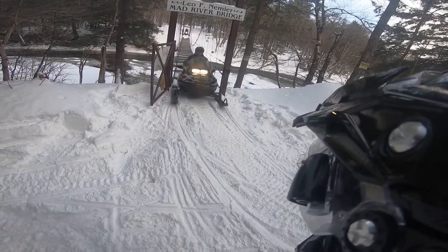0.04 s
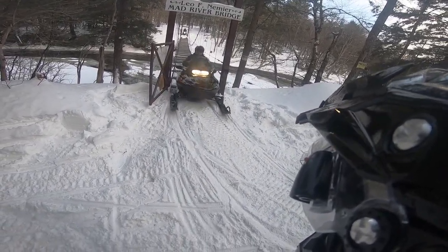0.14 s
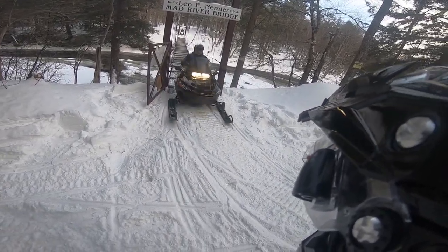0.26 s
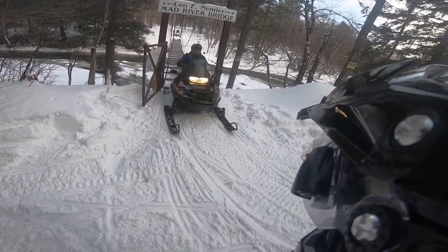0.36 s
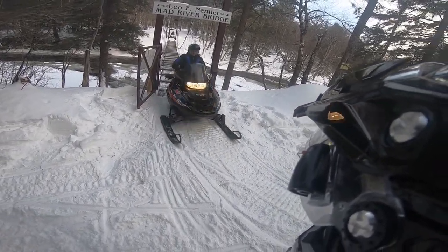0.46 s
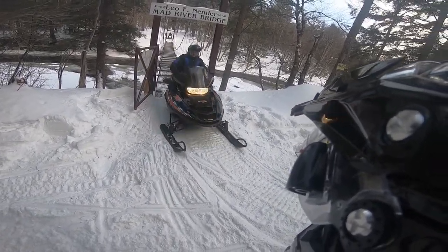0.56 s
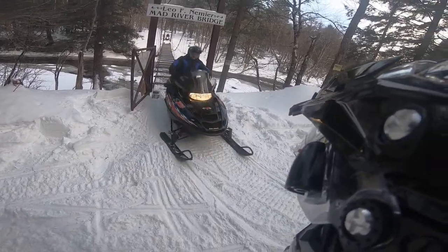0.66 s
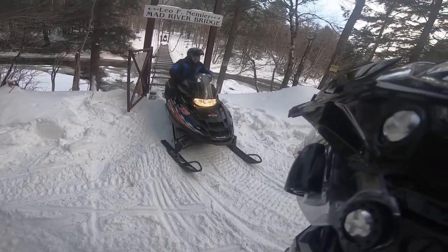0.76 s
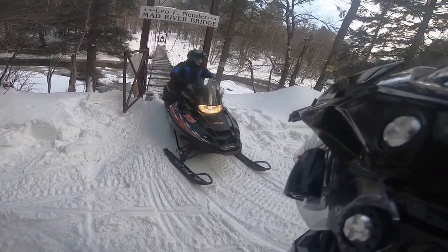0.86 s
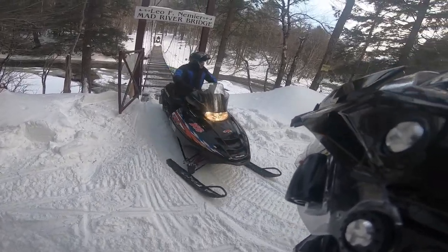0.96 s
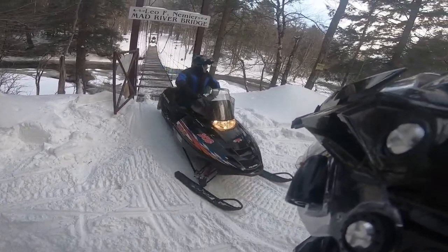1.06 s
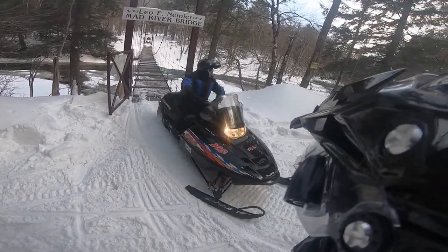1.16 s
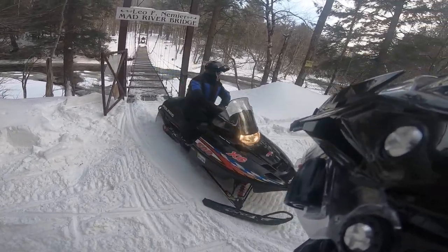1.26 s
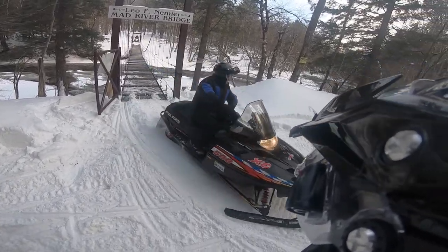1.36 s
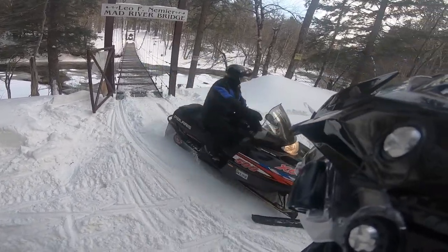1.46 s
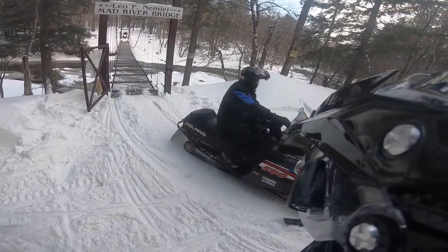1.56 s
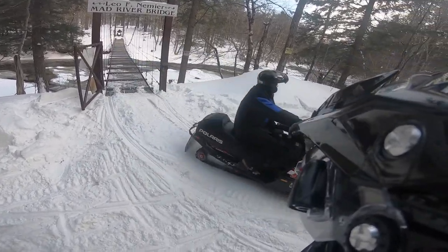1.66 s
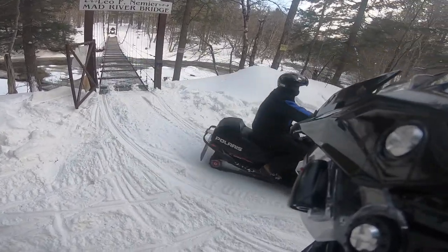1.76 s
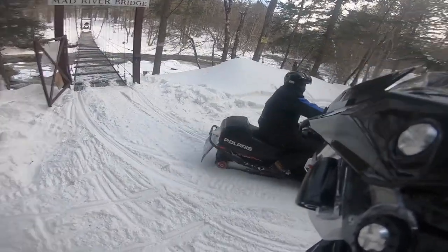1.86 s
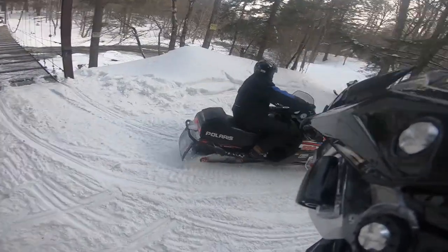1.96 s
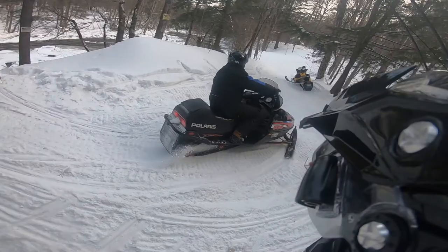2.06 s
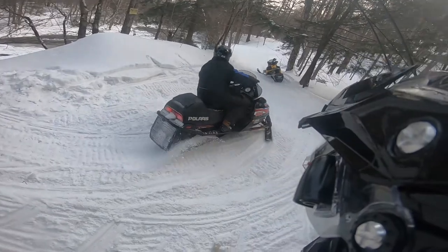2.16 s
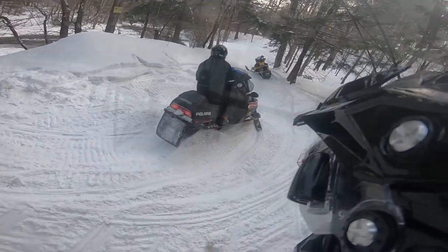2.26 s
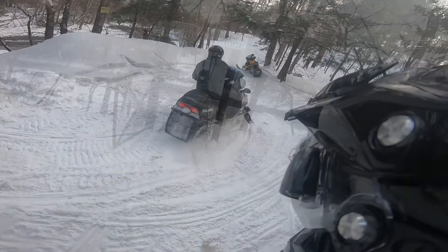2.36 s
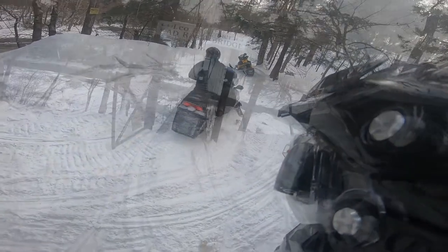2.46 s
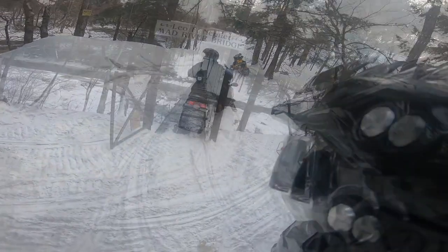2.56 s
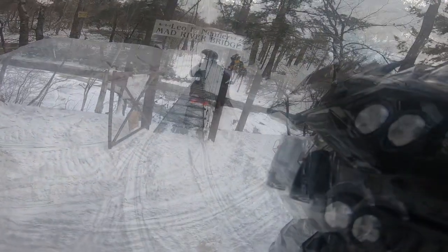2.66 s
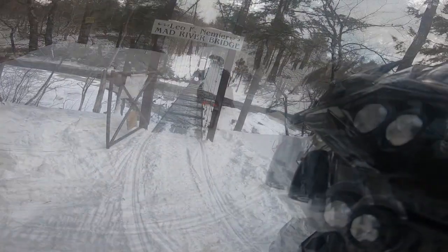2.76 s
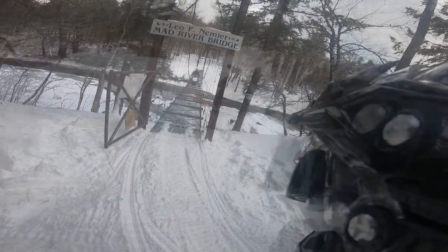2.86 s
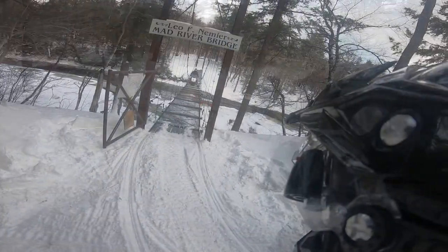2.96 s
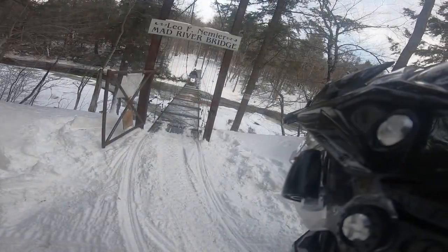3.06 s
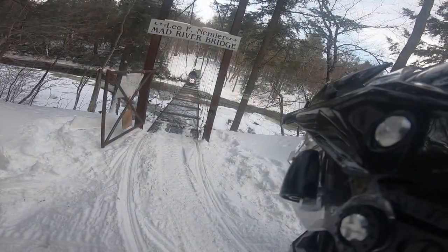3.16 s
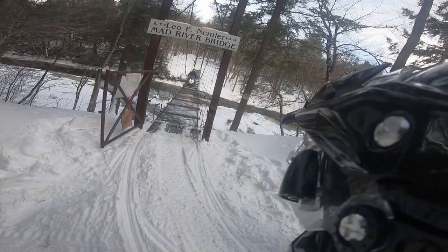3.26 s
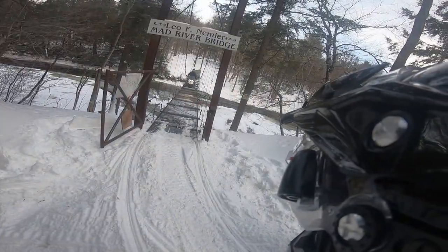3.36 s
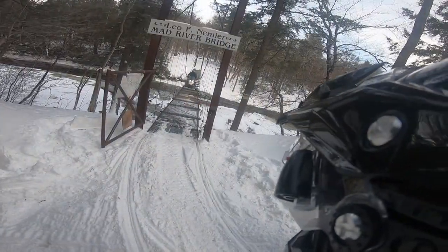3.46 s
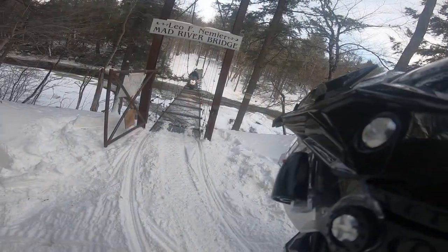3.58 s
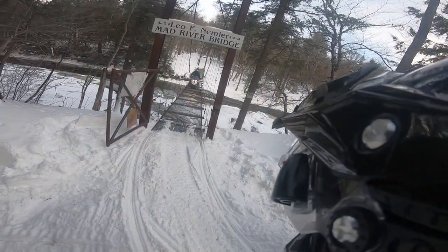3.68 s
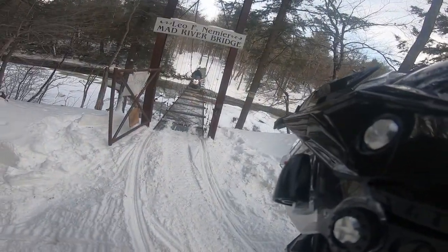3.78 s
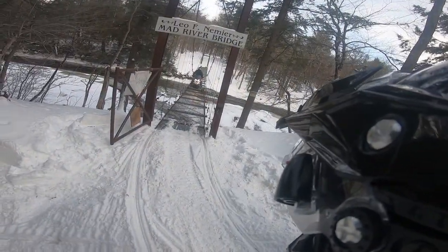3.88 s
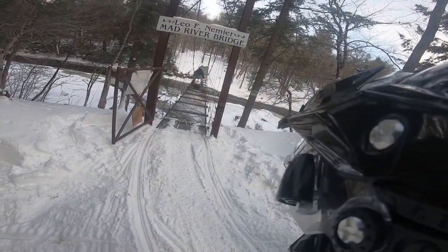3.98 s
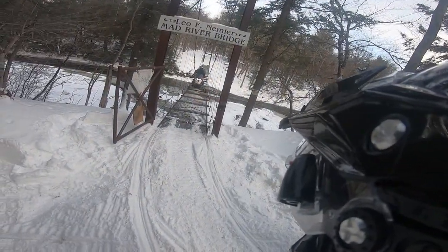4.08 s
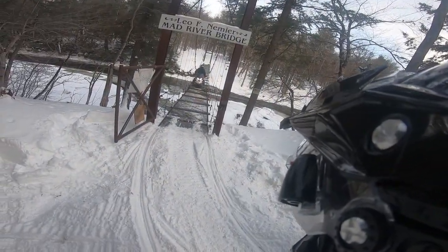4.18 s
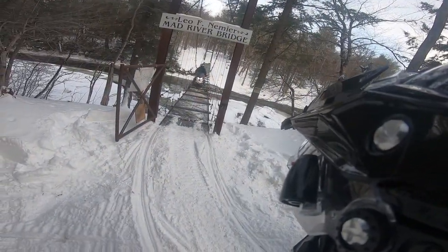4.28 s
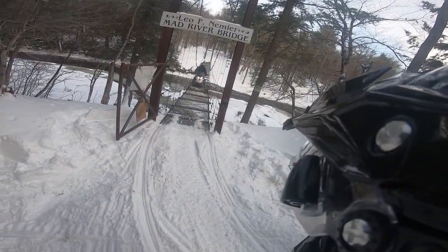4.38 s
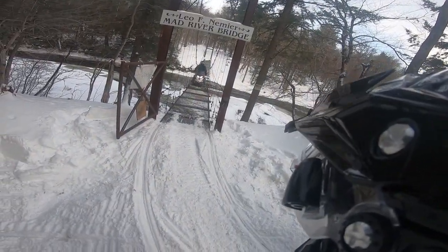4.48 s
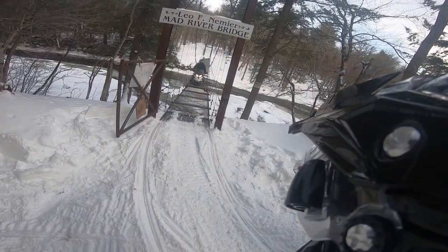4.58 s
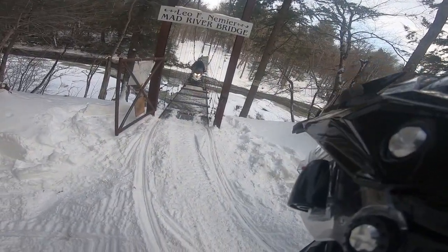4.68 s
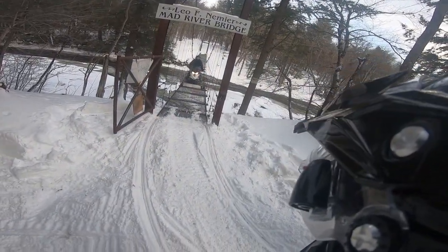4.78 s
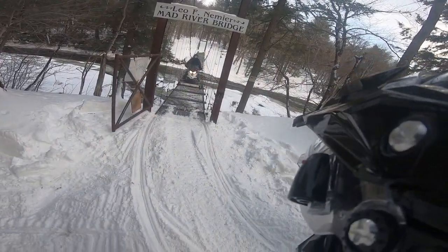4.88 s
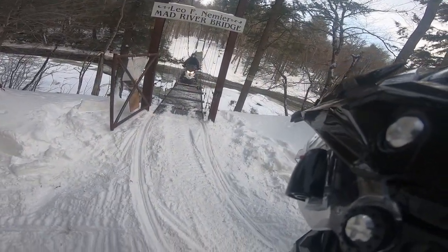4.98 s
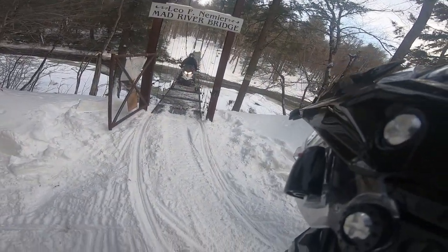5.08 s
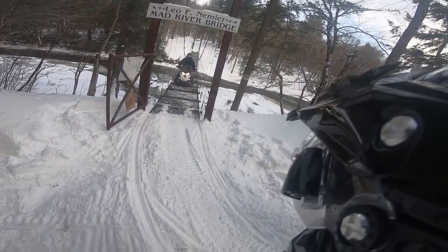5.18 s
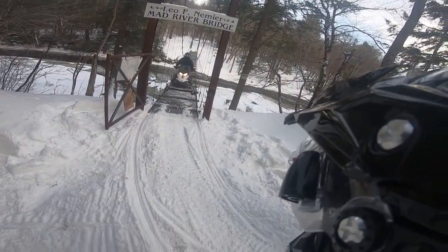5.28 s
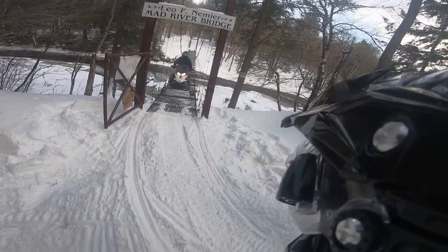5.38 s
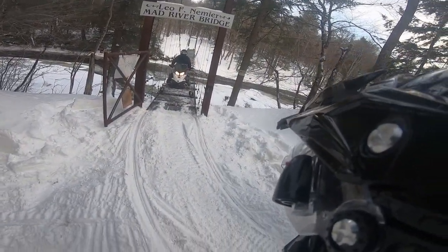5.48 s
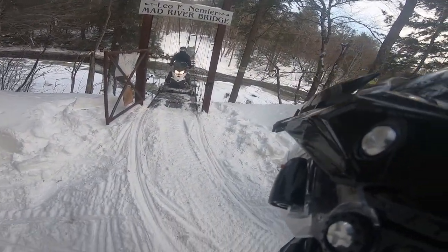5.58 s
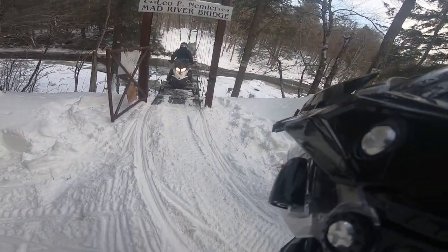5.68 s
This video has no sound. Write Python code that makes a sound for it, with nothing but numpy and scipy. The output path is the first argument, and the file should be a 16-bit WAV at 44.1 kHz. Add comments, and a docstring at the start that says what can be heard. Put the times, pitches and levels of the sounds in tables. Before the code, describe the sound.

A two-stroke snowmobile approaches, revs past close by on packed snow with a sharp knock, pulls away, then a parked sled idles and rattles.

```python
"""A two-stroke snowmobile nears, passes close on packed snow and pulls away: harmonics of its firing rate
give an exhaust note, a bark and a rasp, over the clatter of the track and the hiss of the skis.
Then a parked sled idles on beating tones and rattles its clutch, while an engine nears from far off.
Two microphone ports sit in a plastic case on a rider: its mount sways, rubs, takes bumps and once creaks.
The case rings, strongly near 1.2 and 1.7 kHz, and drives the ports partly against each other."""
import sys
import numpy as np
from scipy.fft import rfft, irfft, next_fast_len
from scipy.io import wavfile
from scipy.ndimage import map_coordinates

SR = 44100
rng = np.random.default_rng(int(sys.argv[2]) if len(sys.argv) > 2 else 0)


def output_pcm(signal):
    """Save a mono or channel-first signal as 16-bit PCM at the path in sys.argv[1].

    Samples are clipped to [-1, 1] before scaling.
    """
    pcm = np.clip(np.atleast_2d(signal).T, -1, 1) * 32767
    wavfile.write(sys.argv[1], SR, np.round(pcm).astype(np.int16))


N = 252869

# path of the moving engine: (time [s], distance [m], facing [dB], above 0 head-on and below 0 turned away)
SLED_PATH = [(0, 8.5, -8), (.55, 3.8, -13.5), (.85, 4.5, 2), (1.3, 3.2, -4.5), (1.72, 2.8, 0),
             (2.0, 3.05, -14), (2.36, 5, -15), (2.72, 19.5, -6.5), (3.0, 31, -1), (3.6, 18.6, 10),
             (5.73, 16, 0.5)]
# blows on the mount: (time [s], strength [dB], time constant of the ring's onset [s])
MOUNT_BLOWS = [(0.052, -25, 0.0026), (0.219, -36.5, 0.0024), (0.401, -38, 0.0045), (0.937, -34, 0.0021),
               (1.31, -36.5, 0.0033), (1.799, -14, 0.0023), (2.994, -38, 0.0035), (3.481, -31, 0.0036),
               (4.463, -34, 0.0012), (4.692, -33.5, 0.0025), (5.147, -37.5, 0.0056), (5.527, -43, 0.0049)]
NEAR_M = 3  # reference distance of the spreading law


def amp(db):
    """Level to amplitude: 20 dB is a factor of ten."""
    return 10 ** (np.asarray(db) / 20)


def lean(db):
    """Level balance: the left port gains db and the right loses it."""
    return amp([[db], [-db]])


def unit(x):
    """Normalization to rms 1; for a stereo pair, the rms of its centre."""
    centre = np.atleast_2d(x).mean(0)
    return x / np.sqrt(np.mean(centre ** 2) + 1e-20)


def along(points, hz, axis=1):
    """Spectral envelope: one column of a frequency table, read on a log axis."""
    table = np.transpose(points)
    return np.interp(np.log(hz + 1), np.log(table[0]), table[axis])


def curves(rows):
    """Piecewise-linear time courses: one value per sample for each column after the time."""
    s, *cols = np.transpose(rows)
    return [np.interp(np.arange(N) / SR, s, c) for c in cols]


def swells(rows, rise, fall, rest_db=-120):
    """Exponential growth and decay: (s, length s, dB) events rise, hold and fall at so many dB a second."""
    t, level = np.arange(N) / SR, np.full(N, float(rest_db))
    for s, length, db in rows:
        before, after = np.maximum(s - t, 0), np.maximum(t - s - length, 0)
        level = np.maximum(level, db - rise * before - fall * after)
    return level


def wobble(rate):
    """Slow random modulation: a smooth curve through `rate` Gaussian knots a second."""
    knots = rng.standard_normal(int(N * rate / SR) + 4)
    return map_coordinates(knots, [np.arange(N) * rate / SR])


def filtered(x, response):
    """Linear filtering: the spectrum times a complex response of frequency."""
    m = next_fast_len(N + SR // 2)
    return irfft(rfft(x, m) * response(np.fft.rfftfreq(m, 1 / SR)), m)[..., :N]


def coloured(x, spectrum):
    """Zero-phase filtering by a (frequency [Hz], level [dB]) table."""
    return filtered(x, lambda hz: amp(along(spectrum, hz)))


def noise(spectrum):
    """Coloured Gaussian noise of rms 1."""
    return unit(coloured(rng.standard_normal(N), spectrum))


def turning(hz):
    """Phase as the time integral of a changing frequency."""
    return 2 * np.pi * np.cumsum(hz) / SR


def add(track, s, sound):
    """Superposition: mix a short sound in at time s."""
    part = track[round(s * SR):][:len(sound)]
    part += sound[:len(part)]


def bursts(rows, t60):
    """Impact noise: for each (s, starting dB) a burst of random signs falls 60 dB in t60 seconds."""
    t, level = np.arange(SR // 20) / SR, np.zeros(N)
    for s, db in rows:
        add(level, s, amp(db - 60 * t / t60))
    return level * np.sign(rng.standard_normal(N))


def case(x, opposed_top_hz=None):
    """Resonant transmission: the ports' opposed motion is a quarter cycle off their common motion."""
    # the case's wall: (frequency [Hz], motion of both ports alike [dB], opposed motion [dB])
    wall = [(60.3, -1.5, -10), (183, -3.5, 0), (343, 1, -2), (600, -0.5, 2.5), (830, -2.5, 8.5),
            (1314, 2, 11), (1754, -3.5, -7.5), (1877, 3, -32), (2170, -7, 4), (2455, -5.5, 10),
            (3220, -3.5, 8.5), (3414, 6, 4.5), (4135, -26.5, -13), (5240, -3, -4.5), (5846, 5, -4),
            (7590, -12.5, -11), (13600, -28.5, -37.5)]
    # resonances of the case: (frequency [Hz], width [Hz], gain at the peak [dB])
    resonances = [(765.4, 10.5, 8.5), (1201.6, 76, 18.5), (1703.5, 65, 18.5), (2835, 133, 6)]

    def response(f):
        ring = np.ones(len(f), complex)
        for centre, width, db in resonances:
            damping = 1j * f * width
            ring *= 1 + (amp(db) - 1) * damping / (centre * centre - f * f + damping)
        alike, opposed = amp(along(wall, f, axis=1)), 1j * amp(along(wall, f, axis=2))
        if opposed_top_hz:
            opposed = opposed / (1 + (f / opposed_top_hz) ** 4)
        return ring * np.array([alike + opposed, alike - opposed])
    return filtered(x, response)


def airborne(spectrum, drive, scatter):
    """Partly coherent field: driven noise through the case, with a share that differs from port to port."""
    direct, left, right = [case(noise(spectrum) * drive) for _ in range(3)]
    return unit(direct + scatter * np.array([left[0], right[1]]))


def nearness(metres):
    """Spherical spreading: dB gained relative to NEAR_M."""
    return 20 * np.log10(NEAR_M / np.maximum(metres, 1))


def engine_levels(dull_db=-3.5, dull_coasting=0.73, dull_per_m=0.8):
    """Load, spreading and directivity set level and brightness; the slope is in dB lost per octave."""
    # squeezes of the throttle: (time [s], length [s], load [dB])
    squeezes = [(.48, 0.81, -3), (2.02, 0.35, -1.5)]
    metres, facing_db = curves(SLED_PATH)
    near_db = nearness(metres)
    # load grows 88 dB/s, falls 35.5 dB/s and is least when coasting
    load_db = swells(squeezes, rise=88, fall=35.5, rest_db=-19)
    exhaust_db = -46 + 1.1 * near_db
    rasp_db = -40 + 1 * load_db + 0.47 * near_db + 0.58 * facing_db
    slope_db = dull_db - dull_coasting * load_db + dull_per_m * metres
    # the lowest harmonics boom when nearer than NEAR_M
    boom_db = 1.5 * np.maximum(near_db, 0)
    return exhaust_db, rasp_db, facing_db, slope_db, boom_db


def passing_engine(jitter=0.001714, sputter=0.26, flutter_db=2.62, fading_db=1.5):
    """Harmonic series: periodic firing pulses and gas puffs sweep their lines through the case's resonances."""
    # pitch of the engine: (time [s], firing rate [Hz])
    speed = [(0, 111), (.3, 113.5), (.47, 120), (.6, 134), (.76, 148.6), (.86, 152.4), (1.12, 153.8),
             (1.39, 152), (1.54, 135), (1.76, 126.6), (1.96, 124.7), (2.14, 132.6), (2.31, 145.5),
             (2.38, 142), (2.59, 132.5), (3.8, 118)]
    # spectrum of the exhaust: (frequency [Hz], level [dB])
    exhaust_spectrum = [(110, -7), (150, -1), (245, 4), (305, -1), (370, -3), (450, -1.5), (540, 0),
                        (620, -2), (690, -5), (770, -13), (900, -10), (1100, -26), (2000, -50)]
    # spectrum of the muffler's bark: (frequency [Hz], level [dB])
    bark_spectrum = [(300, -35), (680, -20), (780, -6), (860, 4), (950, -4), (1070, 0), (1150, 9),
                     (1230, 10), (1290, 4), (1380, -1), (1550, -10), (2000, -40)]
    # loudness of the bark: (time [s], level [dB])
    bark_level = [(0, -60), (.35, -58), (.47, -45.5), (.6, -38.5), (.79, -48), (.92, -41.5), (1.25, -36.5),
                  (1.45, -42.5), (1.75, -44.5), (2.05, -38.5), (2.25, -45), (2.45, -46.5), (2.72, -62.5),
                  (5.73, -59)]
    # spectrum of the rasp: (frequency [Hz], level [dB])
    rasp_spectrum = [(1100, -40), (1530, -3), (1690, 11), (1850, 5), (2000, -3), (2150, 14), (2300, 4),
                     (2480, 13), (2750, 6), (3050, 8), (3500, 0), (6000, -10), (10000, -42)]
    pipe_hz, pipe_width_hz = 423, 49  # the tailpipe's resonance
    pipe_grows, shade_grows = 0.7, 0.2  # dB per dB that the sled is turned away
    drift = .2  # phase wander of each harmonic (radians)
    uneven_db, rasp_uneven_db = -10, -5  # halfway lines; this much weaker still in the rasp
    rough, puff_share = .12, .25  # scatter of the firings; decay of a puff as a share of a cycle
    gas_db, gas_grows = -18, .6  # puffs against pulses; fall in dB per dB of facing

    firing, = curves(speed)
    bark_db, = curves(bark_level)
    exhaust_db, rasp_db, facing_db, slope_db, boom_db = engine_levels()
    phase = turning(firing * (1 + jitter * wobble(39.76)))
    exhaust, bark, rasp = np.zeros((3, N))
    for k in np.arange(1, 29):
        hz = k * firing
        # each harmonic fades and drifts a little on its own
        fading = amp(flutter_db * wobble(10) + fading_db * wobble(2.576))
        line = np.cos(k * phase + drift * wobble(6)) * fading
        # from behind the body shades all but the tailpipe's resonance
        pipe = 1 / (1 + ((hz - pipe_hz) / pipe_width_hz) ** 2)
        tail_db = np.maximum(-facing_db, 0) * (pipe_grows * pipe - shade_grows)
        boost_db = tail_db + (k < 3) * boom_db
        loss_db = slope_db * np.maximum(np.log2(hz / 300), 0)
        exhaust += line * amp(along(exhaust_spectrum, hz) + boost_db - loss_db)
        # the two cylinders differ, which puts weaker lines halfway between
        halfway = np.cos((k + .5) * phase + wobble(6)) * amp(uneven_db) * (1 + .5 * wobble(6.3))
        half_hz = hz + firing / 2
        bark += line * amp(along(bark_spectrum, hz)) + halfway * amp(along(bark_spectrum, half_hz))
        rasp += line * amp(along(rasp_spectrum, hz))
        rasp += halfway * amp(along(rasp_spectrum, half_hz) + rasp_uneven_db)
    unsteady = wobble(110)  # the firings vary in strength
    puffs = np.exp(-(phase / (2 * np.pi) % 1) / puff_share)
    gas = amp(gas_db - gas_grows * facing_db)  # heard more from behind

    def voiced(lines, spectrum):
        pulses = unit(case(lines * (1 + rough * unsteady)))
        return (pulses + gas * airborne(spectrum, puffs, scatter=0.087)) / np.hypot(1, gas)

    note = unit(case(exhaust * (1 + sputter * unsteady))) * amp(exhaust_db)
    return note + voiced(bark, bark_spectrum) * amp(bark_db) + voiced(rasp, rasp_spectrum) * amp(rasp_db)


def track_and_snow():
    """Friction and impact noise: the track clatters, louder as it nears, and the skis hiss over the snow."""
    # spectrum of the track's clatter: (frequency [Hz], level [dB])
    clatter_spectrum = [(80, -24), (150, 0), (260, 10), (480, -5), (800, 5.5), (1200, -1), (1600, -1.5),
                        (2500, -3.5), (3500, -5), (5000, -3.5), (9000, -21.5)]
    # spectrum of skis on snow: (frequency [Hz], level [dB])
    snow_spectrum = [(1500, -19.5), (3000, -7.5), (4500, 3), (6000, -3.5), (8000, -4), (10000, -5),
                     (11000, -8), (14500, -11)]
    # loudness of the skis: (time [s], level [dB])
    hiss_level = [(0, -54.5), (.33, -55.5), (.55, -48.5), (1.15, -47), (1.92, -65), (2.25, -56.5),
                  (2.6, -71), (3.5, -64), (5.73, -63.5)]
    metres, _ = curves(SLED_PATH)
    hiss_db, = curves(hiss_level)
    clatter_db = -44 + 0.58 * nearness(metres)
    link_drive = amp(0.91 * wobble(90) + 0.86 * wobble(12))
    spray_drive = amp(1.0 * wobble(250) + 1.3 * wobble(13))
    links = airborne(clatter_spectrum, link_drive, scatter=0.28) * amp(clatter_db)
    spray = airborne(snow_spectrum, spray_drive, scatter=0.91) * amp(hiss_db)
    return links * lean(.4) + spray * lean(1.6)


def mount_levels():
    """Damped response: jolts and bumps set off sway, shudder and rubbing (dB), each with its own decay."""
    # the rider's jolts: (time [s], length [s], sway [dB], shudder [dB], rubbing [dB]), before overall trims
    jolts = [(0.166, 0.074, -32.5, -48.5, -46.5), (0.537, 0.15, -39.5, -45, -41.5),
             (0.689, 0.048, -33, -39.5, -39.5), (0.927, 0.1, -31, -42.5, -37.5),
             (1.136, 0.088, -32, -45.5, -39), (1.284, 0.064, -35.5, -39, -33.5),
             (1.437, 0.027, -33.5, -41.5, -49), (1.617, 0.14, -43, -44, -53),
             (1.892, 0.074, -42, -33, -31.5), (2.094, 0.043, -30.5, -43, -40),
             (2.411, 0.045, -34.5, -53, -62), (3.545, 0.06, -39.5, -54, -43.5),
             (3.85, 0.029, -27.5, -41, -64), (3.932, 0.039, -29.5, -45.5, -58),
             (4.539, 0.097, -29.5, -41.5, -50.5), (4.684, 0.052, -32.5, -46.5, -45),
             (5.14, 1, -35, -53, -54), (5.395, 0.23, -28.5, -45.5, -43.5), (5.527, 0.044, -27.5, -51, -34)]
    jolt_rise, rub_rise = 380.5, 601  # dB per second
    s, length, sway_db, shudder_db, rub_db = np.transpose(jolts)

    def after_bumps(share_db):
        # the slip follows the blow by 6.4 ms and grows only up to a limit
        return [(at + 0.0064, 0, min(db, -28) + share_db) for at, db, _ in MOUNT_BLOWS]

    # at rest the mount still sways and rubs faintly
    sway = swells([*zip(s, length, sway_db), *after_bumps(-13)], jolt_rise, fall=122, rest_db=-67.5)
    shudder = swells(zip(s, length, shudder_db), jolt_rise, fall=171)
    rub = swells([*zip(s, length, rub_db), *after_bumps(-2)], rub_rise, fall=176.5, rest_db=-57.5)
    return sway, shudder, rub


def mount_motion(sway_hz=35, sway_db=-2.0, shudder_db=-1, rub_db=-2):
    """Low resonance and friction: the mount sways near one pitch, shudders and rubs as the rider moves."""
    # spectrum of the shudder: (frequency [Hz], level [dB])
    shudder_spectrum = [(15, -16.5), (33, 5.5), (50, 4.5), (70, 0), (95, 2), (125, -5), (170, -20),
                        (300, -23.5), (600, -72.5)]
    # spectrum of the rubbing: (frequency [Hz], level [dB])
    rubbing_spectrum = [(50, -5), (100, -22), (140, -0.5), (175, 8), (215, -5.5), (300, -17), (400, -20),
                        (800, -70)]
    sway, judder, rub = mount_levels()
    # it nods and rolls: the right port moves with the nod alone, the left mostly with the roll
    nod, roll = [unit(np.sin(turning(sway_hz * (1 + 0.16 * wobble(26))))) for _ in range(2)]
    swing = np.array([0.21 * nod + 0.8 * roll, 1.7 * nod]) * amp(sway + sway_db)
    shudder = unit(np.array([noise(shudder_spectrum), noise(shudder_spectrum)])) * amp(judder + shudder_db)
    rubbing = airborne(rubbing_spectrum, 1, scatter=0.23) * amp(rub + rub_db)
    return swing + shudder + rubbing * lean(.6)


def idling_sled(rattle_hz=41.83, rattle_db=-5, stray_db=6, stray_spread_db=2.5):
    """Beating and periodic impact: close tones throb; a loose clutch rattles each turn and at times clacks hard."""
    # tones of the idling sled: (frequency [Hz], level ahead of the case [dB])
    tones = [(164.8, -62), (182.6, -57), (79, -78)]
    # brief swells of the hum: (time [s], length [s], rise over its usual level [dB])
    hum_swells = [(3.443, .02, 21), (4.785, 0.023, 18)]
    # the hardest clutch clacks: (time [s], strength before colouring and trim [dB])
    hard_clacks = [(3.497, -33), (3.5665, -34), (3.5897, -33), (3.6365, -35), (3.8268, -36), (3.899, -35),
                   (3.9955, -31), (4.1147, -28.5), (4.1617, -33), (4.2328, -29.5), (4.256, -30.5),
                   (4.281, -35), (4.335, -36), (4.5122, -32), (4.5365, -33), (4.584, -33), (4.6288, -33),
                   (4.6528, -32)]
    # spectrum of clack and rattle: (frequency [Hz], level [dB])
    clack_spectrum = [(500, -26.5), (1200, -19), (2000, -9.5), (2900, -0.5), (3600, -2.5), (5000, -4.5),
                      (6500, -19), (9000, -21), (14000, -28)]
    # bouts of rattle: (time [s], length [s], level before trims [dB])
    bouts = [(3.45, 0.17, -44.5), (3.86, 0.098, -48), (4.2, 0.07, -43.5), (4.48, 0.16, -41.5),
             (5.17, 0.027, -49), (5.55, 0.046, -47.5)]
    steady = (2.924, N / SR, -52)  # the lasting rattle, as a bout
    clack_db, clack_t60_s = 3, .013  # trim and decay of each clack

    hum = np.zeros(N)
    for hz, db in tones:
        tone = np.sin(turning(hz * (1 + 0.01585 * wobble(31))))
        hum += np.sqrt(2) * amp(db + 3.6 * wobble(3.63)) * tone
    hum = hum * amp(swells(hum_swells, rise=601, fall=348, rest_db=0))
    # a whole number of turns passes between two hard clacks
    marks = np.array([0, *(s for s, db in hard_clacks), N / SR])
    turns = np.cumsum(np.round(np.diff(marks, prepend=0) * rattle_hz))
    since = np.interp(np.arange(N) / SR, marks, turns) % 1  # share of the turn gone by
    beats = (2.0 + np.exp(-since / 0.048)) * amp(2.7 * wobble(160))
    level = swells(bouts + [steady], rise=87, fall=48, rest_db=-58)
    rattle = airborne(clack_spectrum, beats, scatter=0.38) * amp(level + rattle_db)
    # every turn gives a further clack of chance strength
    strength_db = level + stray_db + stray_spread_db * wobble(40)
    strays = [(i / SR, strength_db[i]) for i in np.flatnonzero(np.diff(since) < 0)]
    clacks = coloured(bursts(hard_clacks + strays, clack_t60_s), clack_spectrum) * amp(clack_db)
    return case(hum + clacks) * lean(1.2) + rattle * lean(1.3)


def bumps(bump_db=2, thud_db=5, thud_t60=0.036):
    """Modal excitation: each blow rings the mount's modes at slightly new strengths and thuds at either port."""
    # modes of the mount: (frequency [Hz], level [dB], 60 dB decay time [s])
    mount_modes = [(156.6, -2, 0.073), (309, -1, 0.084), (494, -3, 0.013), (675, -27.5, 0.043),
                   (1070, -33, 0.027)]
    # spectrum of the thud: (frequency [Hz], level [dB])
    thud_spectrum = [(60, -11.5), (150, 15.5), (300, -2.5), (500, -8.5), (800, -1.5), (1500, -51),
                     (4000, -66.5)]
    thud_top_db = -29  # a harder blow rings more but thuds no louder
    rings, thuds, t = np.zeros(N), np.zeros(N), np.arange(SR // 4) / SR
    for s, db, attack in MOUNT_BLOWS:
        ring = np.zeros(len(t))
        for hz, level, t60 in mount_modes:
            ring += amp(level + rng.normal(0, 1) - 60 * t / t60) * np.sin(2 * np.pi * hz * t)
        add(rings, s, -amp(db + bump_db) * ring * (1 - np.exp(-t / attack)))
        add(thuds, s, amp(min(db, thud_top_db) + thud_db - 60 * t / thud_t60))
    thud = coloured(thuds * rng.standard_normal((2, N)), thud_spectrum)
    return (case(rings) + thud) * lean(2.4)


def sagging_tones(waver=0.0014):
    """Frequency-modulated tones: a thin whine of the drive and a strong eighth harmonic of the engine waver,
    sag in pitch and die away."""
    # a whine of the drive, then the engine's eighth harmonic: (time [s], length [s], pitch at time 0 [Hz], sag
    # [Hz per s], level [dB])
    falling_tones = [(0.12, 0.13, 781, 33.7, -57), (0.06, 0.047, 964, 120, -55.5)]
    out = np.zeros((2, N))
    for s, length, hz, sag, db in falling_tones:
        pitch = (hz - sag * np.minimum(np.arange(N) / SR, 1)) * (1 + waver * wobble(31))
        level = swells([(s, length, db)], rise=154, fall=75)
        out += unit(case(np.sin(turning(pitch)))) * amp(level)
    return out


def track_slaps(slap_hz=800, slap_db=5, slap_t60=0.053, tick_hz=6300, tick_spread=0.09, tick_t60=0.018):
    """Filtered impacts: the track slaps its rails (low-pass) and a ski ticks on something hard (band-pass)."""
    # track slaps: (time [s], strength before filter and trim [dB])
    slap_times = [(1.543, -29), (1.624, -29), (1.7203, -25.5), (2.0405, -30.5), (2.073, -27)]
    # ski ticks: (time [s], strength before the filter [dB])
    tick_times = [(1.5545, -25)]
    low_pass = lambda hz: amp(slap_db) / (1 + 1j * hz / slap_hz) ** 3
    band_pass = lambda hz: 1 / (1 + ((hz / tick_hz - 1) / tick_spread) ** 2)
    slaps = filtered(bursts(slap_times, slap_t60), low_pass)
    ticks = filtered(bursts(tick_times, tick_t60), band_pass)
    return case(slaps + ticks)


def creaks(jitter=0.04, rough_db=2.5, scrape_db=-2, opposed_top_hz=2000, pan_db=1.0):
    """Stick-slip: plastic squeaks at a sagging slip rate; the treble moves both ports alike."""
    # creaks around the knock: (time [s], length [s], first slip rate [Hz], last slip rate [Hz], level [dB])
    squeaks = [(1.793, .009, 830, 760, -41), (1.824, 0.0219, 840, 705, -36.5),
               (1.8452, 0.0099, 610, 590, -33.5)]
    # spectrum of the noise between slips: (frequency [Hz], level [dB])
    scrape_spectrum = [(300, -5), (2000, 4), (6000, -0.5), (9000, -19)]
    # colour of the whole creak: (frequency [Hz], level [dB])
    creak_spectrum = [(600, -5.5), (760, -4), (1200, -14), (1550, -8), (1850, -17), (2400, -10),
                      (3000, 2.5), (3500, -16), (4200, -2), (6000, -31)]
    slips = np.zeros(N)
    for s, length, start_hz, end_hz, db in squeaks:
        done = np.clip((np.arange(N) / SR - s) / length, 0, 1)
        slip_hz = start_hz + (end_hz - start_hz) * done
        phase = turning(slip_hz * (1 + jitter * wobble(700)))
        pulses = sum(np.cos(k * phase) for k in range(1, 9))
        scrape = amp(scrape_db) * np.std(pulses) * noise(scrape_spectrum)
        envelope = np.sqrt(np.abs(np.sin(np.pi * done)))
        slips += (pulses + scrape) * amp(db + rough_db * wobble(600)) * envelope
    return case(coloured(slips, creak_spectrum), opposed_top_hz) * lean(pan_db)


def scene():
    """Superposition of both sleds and the noises of the case and its mount."""
    sleds = passing_engine() + track_and_snow() + idling_sled() + sagging_tones() + track_slaps()
    return sleds + mount_motion() + bumps() + creaks()


def record(dry):
    """Band limiting: nothing at or above 14750 Hz is kept."""
    return filtered(dry, lambda hz: hz < 14750)


dry = scene()
out = record(dry)
output_pcm(out)
```